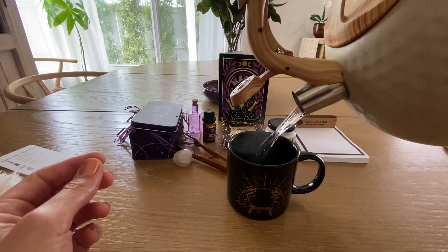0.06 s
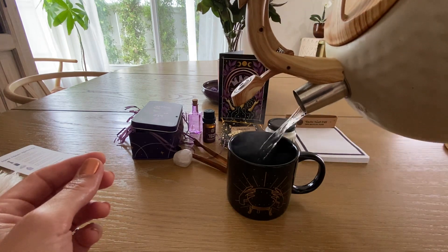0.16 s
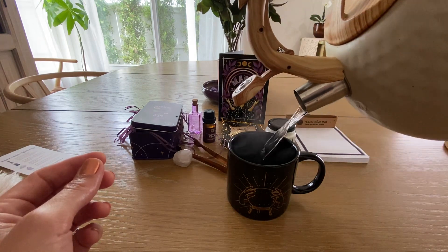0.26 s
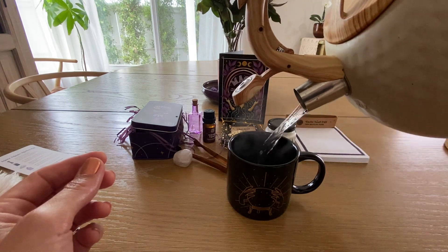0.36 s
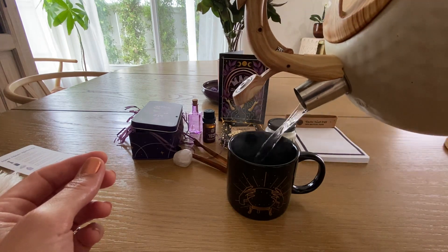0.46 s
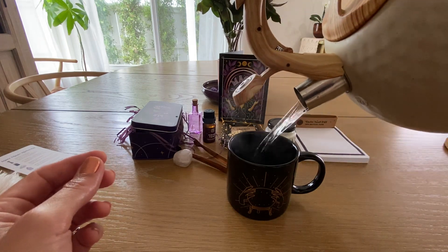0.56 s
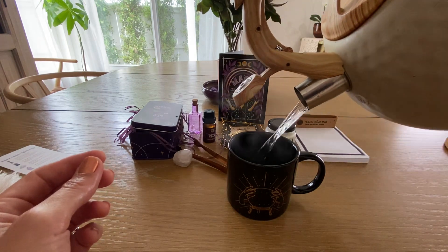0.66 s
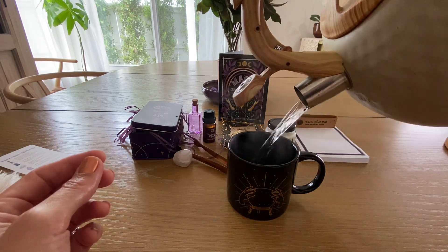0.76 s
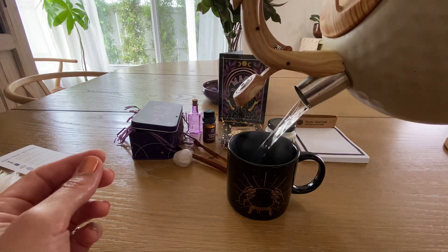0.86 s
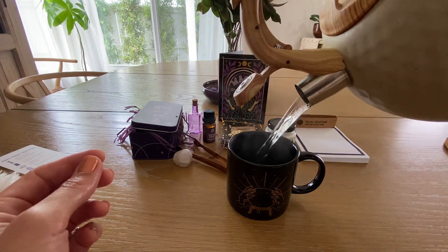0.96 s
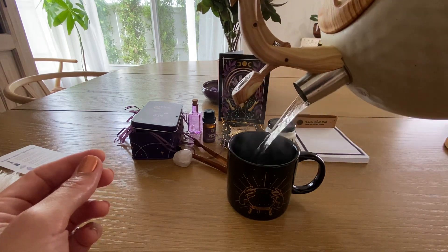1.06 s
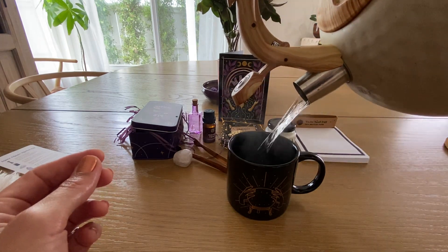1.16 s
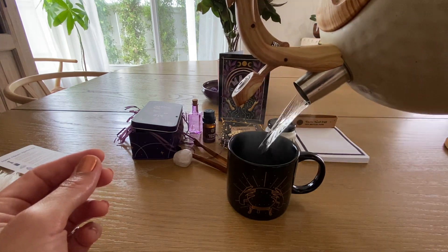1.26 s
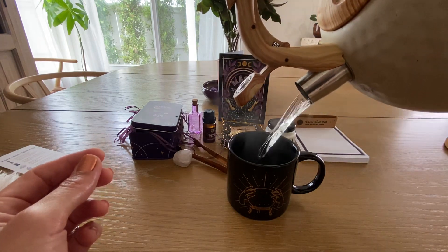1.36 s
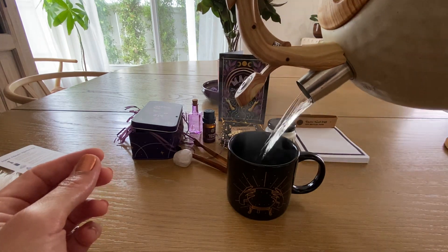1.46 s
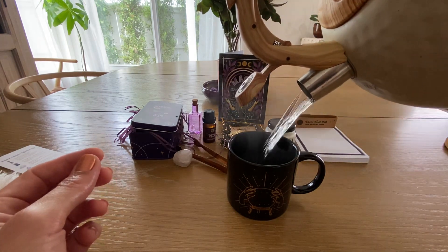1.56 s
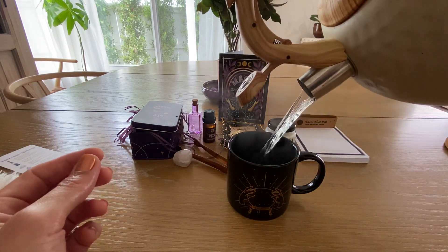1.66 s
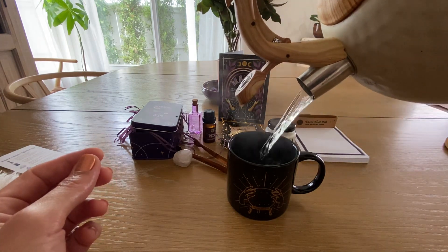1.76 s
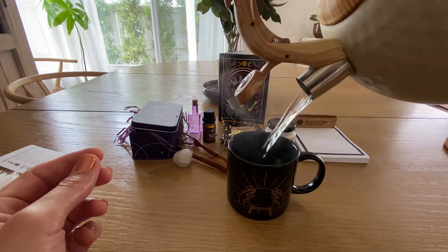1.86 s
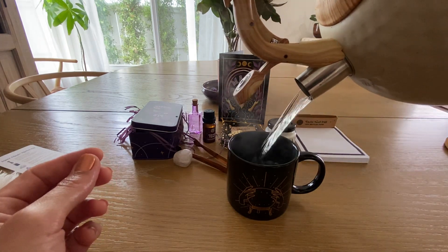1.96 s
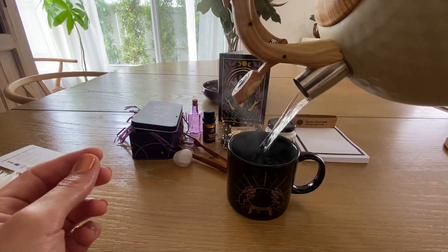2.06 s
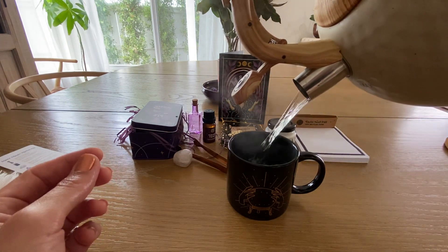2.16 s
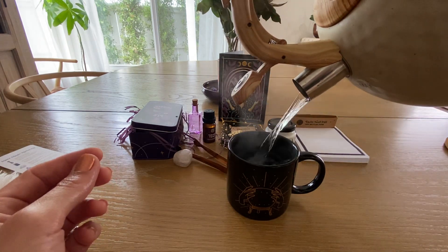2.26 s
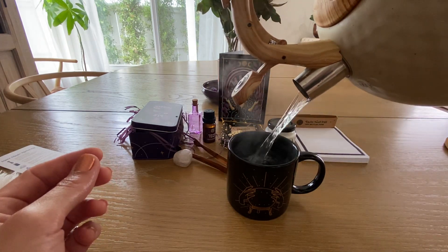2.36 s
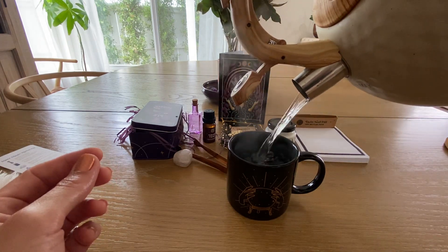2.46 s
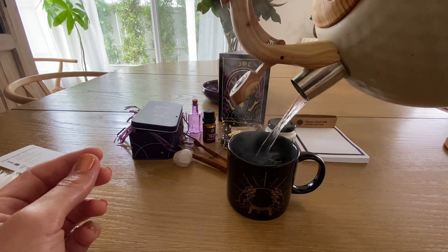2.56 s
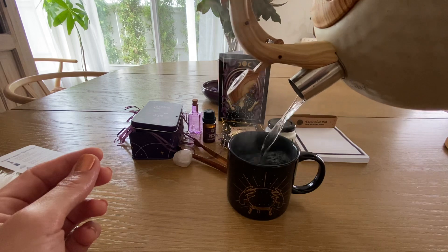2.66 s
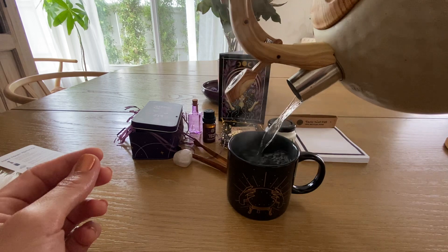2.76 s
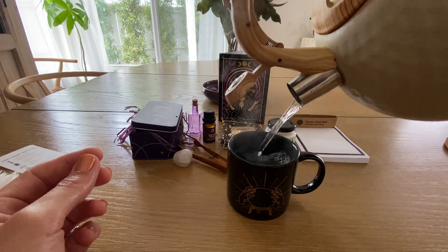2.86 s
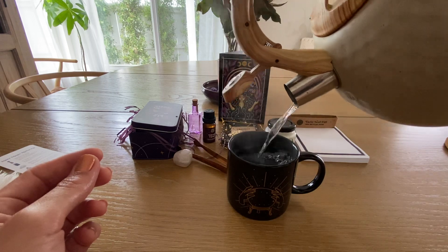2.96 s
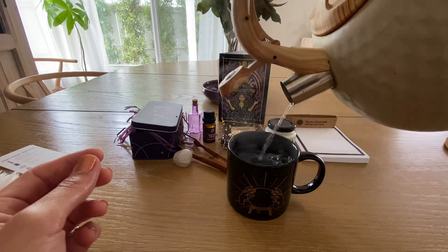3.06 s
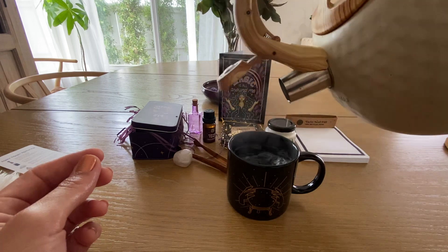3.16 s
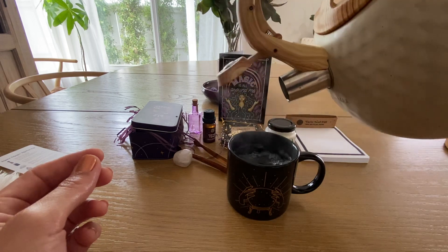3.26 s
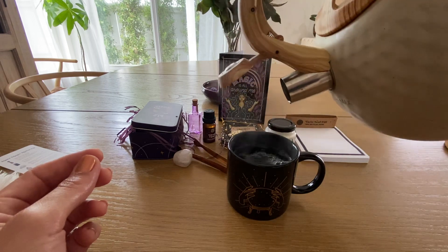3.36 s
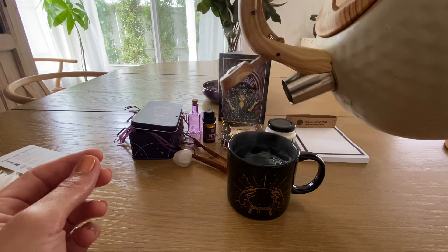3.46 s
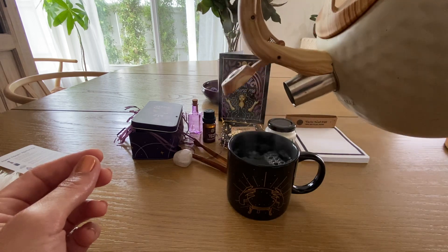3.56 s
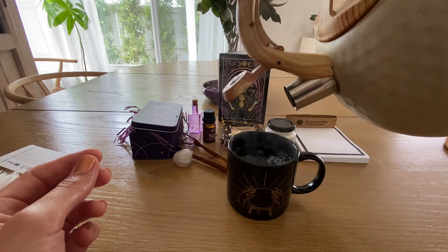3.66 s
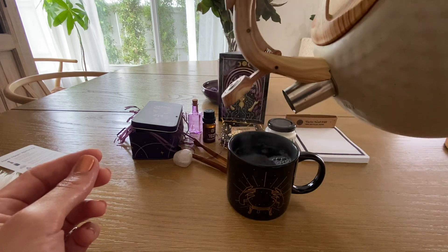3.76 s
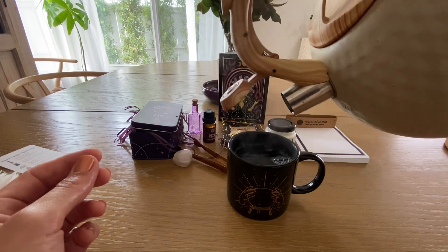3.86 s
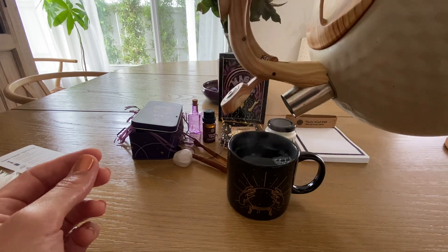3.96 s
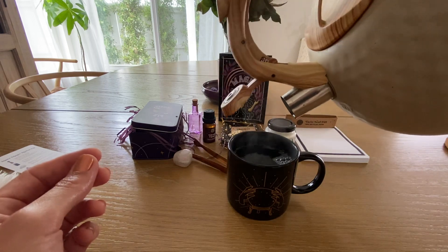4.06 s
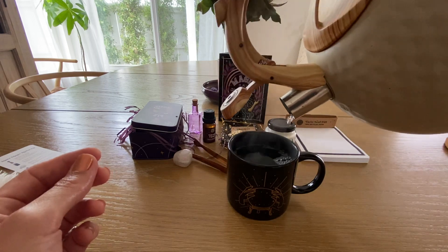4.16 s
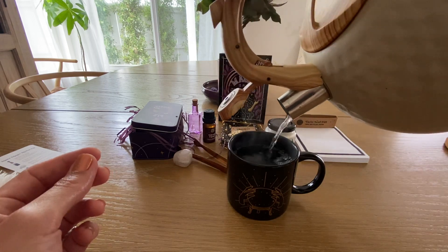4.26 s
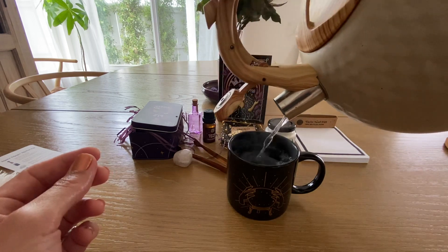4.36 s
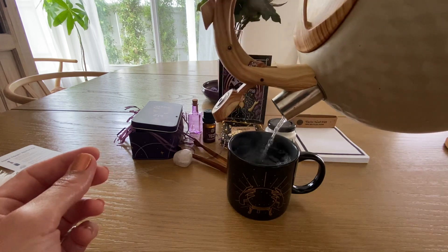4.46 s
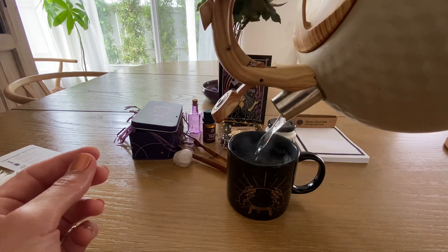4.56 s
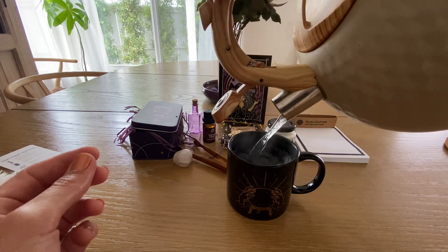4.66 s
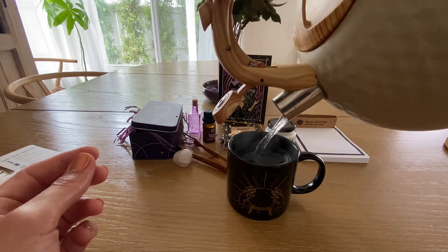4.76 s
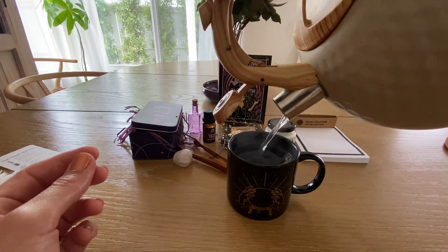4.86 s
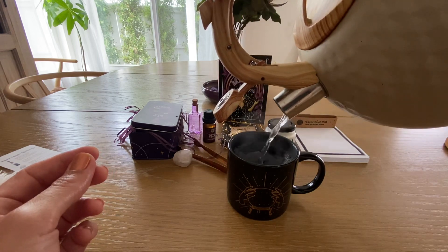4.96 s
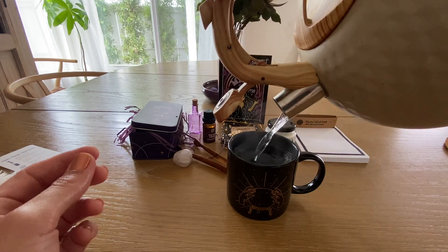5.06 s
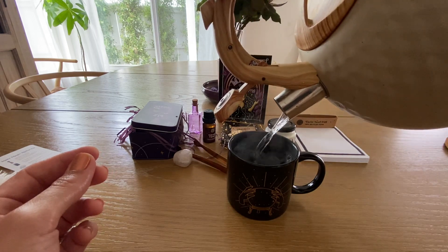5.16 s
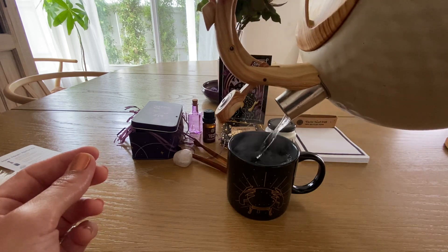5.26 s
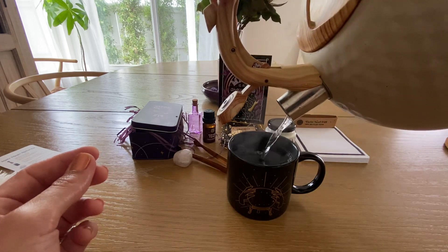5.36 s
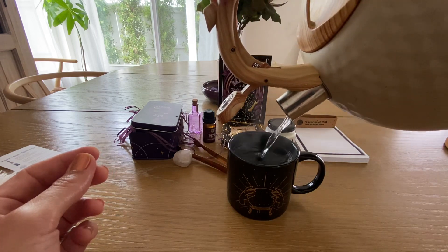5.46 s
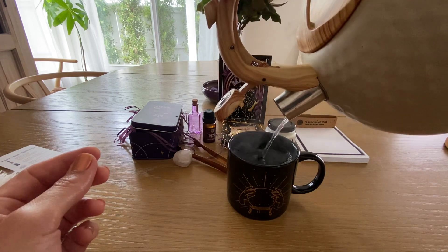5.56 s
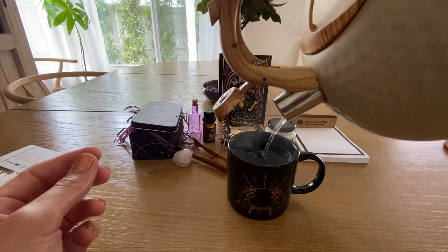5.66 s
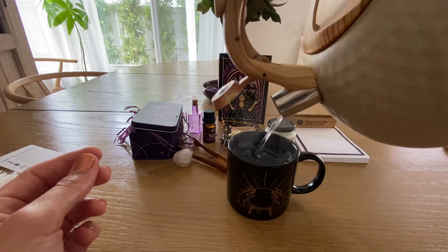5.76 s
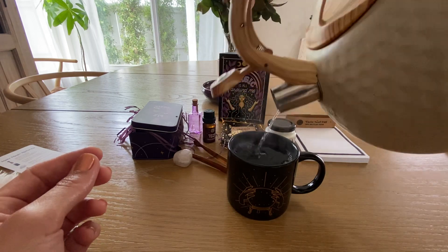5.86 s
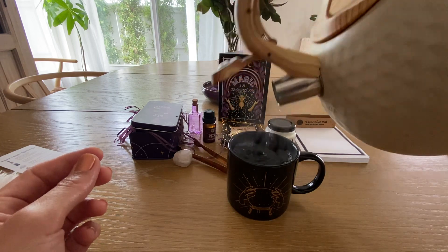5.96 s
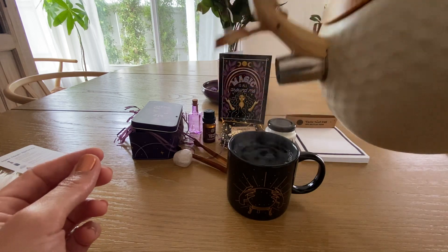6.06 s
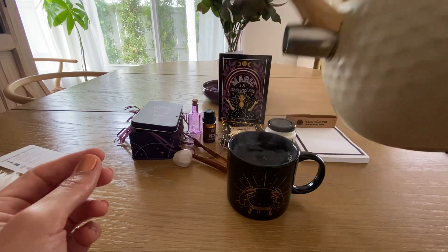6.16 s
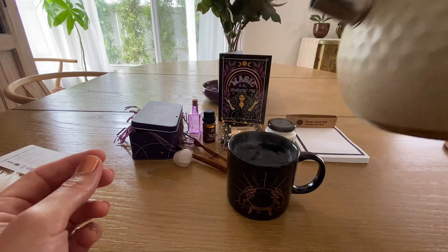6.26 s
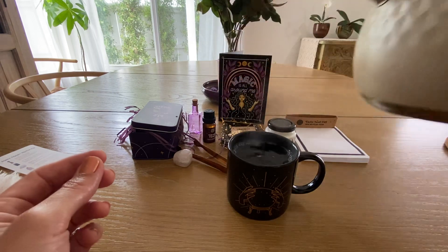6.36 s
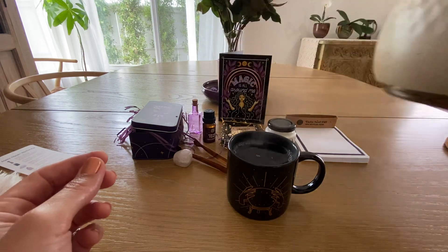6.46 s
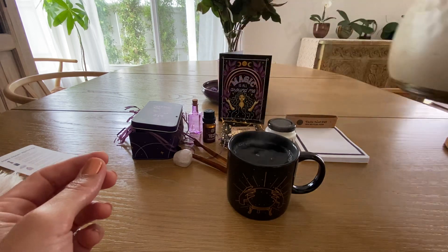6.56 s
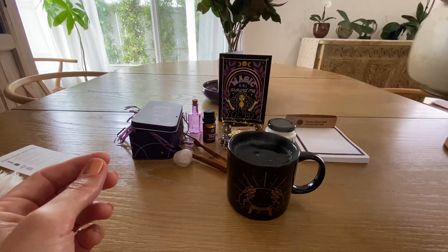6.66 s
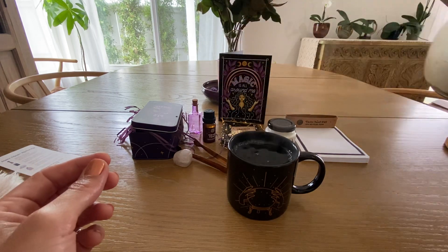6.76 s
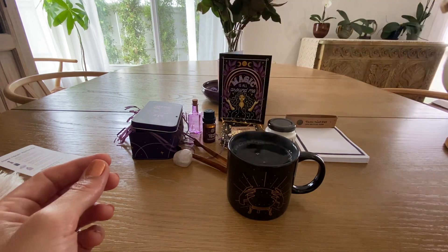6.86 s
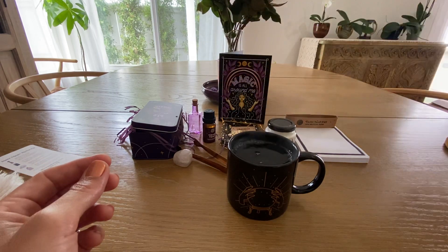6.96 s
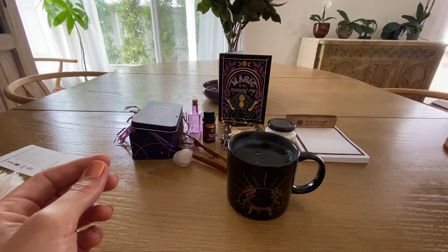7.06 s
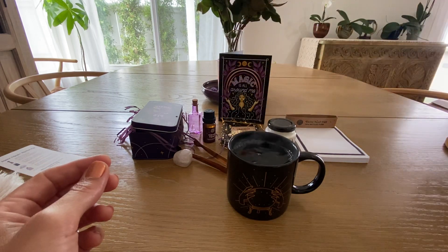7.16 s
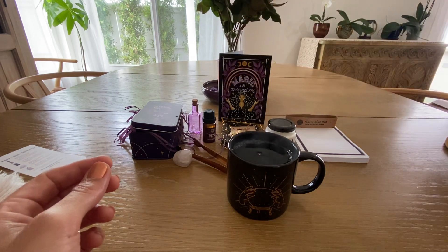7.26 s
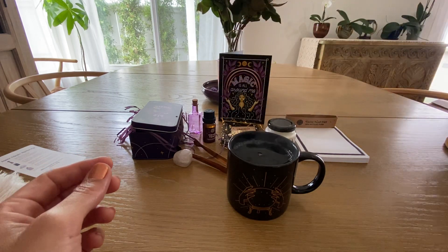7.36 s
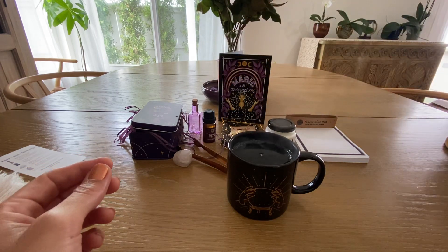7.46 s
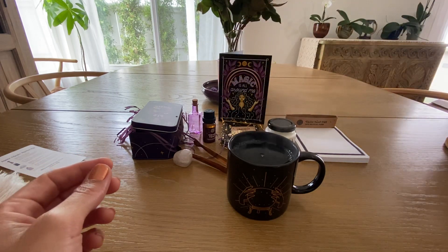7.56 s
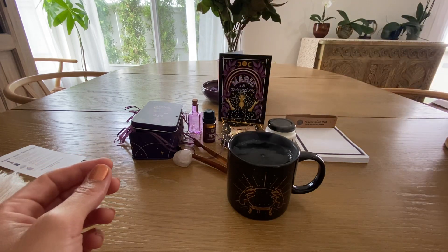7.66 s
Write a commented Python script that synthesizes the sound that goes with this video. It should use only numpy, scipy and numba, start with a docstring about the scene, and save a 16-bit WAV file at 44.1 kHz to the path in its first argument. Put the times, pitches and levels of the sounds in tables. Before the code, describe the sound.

Hot water pours from a kettle into a mug in two gurgling pours, then the kettle lands with a sharp knock and brief hiss.

```python
"""Hot water poured into a mug

Water runs from a kettle into a mug in two pours: damped gliding tones plop, noise clicks tick, foam fizzes on.
The kettle is put down with a knock of filtered noise and ringing modes; a noise hiss follows and dies away.
Low wavering tones and rumble hum throughout. Two microphone ports hear each source with a small lag.
"""
import sys
import numpy as np
from scipy import signal
from scipy.fft import rfft, irfft, next_fast_len
from scipy.io import wavfile
from scipy.ndimage import uniform_filter1d
from numba import njit

SR = 44100
rng = np.random.default_rng(int(sys.argv[2]) if len(sys.argv) > 2 else 0)


def master_out(mix):
    """Clip the mix to full scale and print it as 16-bit PCM to the path in sys.argv[1]."""
    frames = np.transpose(np.atleast_2d(mix))
    ceiling = np.clip(frames, -1, 1)
    pcm = np.round(ceiling * 32767).astype(np.int16)
    wavfile.write(sys.argv[1], SR, pcm)


N = 339349

# Single bubbles. Each row: start in seconds, peak level in dB before pan and mug, starting pitch in Hz.
PLOPS = [(0.108, -48.5, 865), (0.122, -46.5, 1015), (0.159, -49, 1480), (0.185, -44.5, 1120),
         (0.244, -45, 4360), (0.258, -42.5, 1930), (0.297, -48.5, 1990), (0.33, -40, 3300),
         (0.348, -37.5, 3090), (0.372, -39, 3170), (0.389, -38, 2830), (0.447, -52, 1580),
         (0.466, -38.5, 3100), (0.552, -40, 2790), (0.582, -50, 1760), (0.608, -45.5, 1720),
         (0.636, -46.5, 1430), (0.709, -54, 3100), (0.784, -46, 3040), (0.836, -41.5, 1484),
         (0.904, -44, 1530), (0.923, -37, 3240), (0.959, -44, 1610), (0.99, -43, 1490), (1.024, -34, 2800),
         (1.045, -45, 1510), (1.061, -37.5, 1800), (1.076, -31, 1790), (1.09, -36.5, 1060),
         (1.11, -38, 1380), (1.294, -44, 1430), (1.306, -47.5, 1030), (1.336, -48, 1000),
         (1.363, -37, 1010), (1.402, -38, 980), (1.419, -39, 980), (1.455, -52, 990), (1.472, -43, 1320),
         (1.493, -44, 1400), (1.509, -37.5, 1540), (1.527, -40.5, 1500), (1.528, -47, 633),
         (1.576, -41, 975), (1.597, -39, 876), (1.597, -54, 3000), (1.638, -49, 1590), (1.662, -48, 940),
         (1.668, -51, 2570), (1.694, -43, 1070), (1.704, -46, 944), (1.708, -46.5, 2380),
         (1.746, -49, 1430), (1.946, -54, 1600), (1.975, -45, 1750), (2.053, -52.5, 4550),
         (2.077, -47, 1560), (2.098, -50.5, 3940), (2.107, -51, 4440), (2.173, -44.5, 1680),
         (2.19, -55, 4300), (2.223, -52, 1600), (2.322, -53, 1600), (2.352, -57, 1630), (2.362, -48, 2430),
         (2.39, -53, 1600), (2.45, -53, 2600), (2.466, -45.5, 2700), (2.512, -47.5, 2520),
         (2.61, -48, 1880), (2.668, -52, 2600), (2.717, -45, 2500), (2.742, -43.5, 1750),
         (2.788, -43.5, 1705), (2.878, -59, 1730), (2.893, -51, 2830), (2.931, -39, 1810),
         (2.956, -44, 2970), (2.977, -42, 1900), (2.992, -45, 1680), (3.013, -51, 2900), (3.028, -44, 1520),
         (3.035, -45, 3940), (3.056, -44, 1640), (3.067, -41, 1730), (3.079, -43, 2480), (3.091, -37, 1960),
         (3.131, -35.5, 1810), (4.365, -40.5, 2060), (4.373, -47, 1970), (4.385, -46.5, 1900),
         (4.423, -56, 1790), (4.448, -36, 1710), (4.467, -38.5, 1470), (4.482, -41.5, 3140),
         (4.504, -42, 2940), (4.511, -44, 4400), (4.54, -44, 2780), (4.55, -41.5, 1850),
         (4.625, -48.5, 1920), (4.659, -61, 4200), (4.728, -57.5, 4100), (4.731, -49.5, 2100),
         (4.765, -55.5, 5400), (4.801, -42.5, 1870), (4.822, -48, 1600), (4.824, -48, 1040),
         (4.838, -54.5, 4200), (4.861, -54.5, 3860), (4.902, -55, 3800), (4.929, -58.5, 5300),
         (4.946, -51, 2640), (4.958, -43, 1840), (4.984, -36, 2060), (4.999, -39.5, 1430),
         (5.025, -39, 960), (5.026, -46, 1500), (5.036, -52, 5330), (5.0563, -52.5, 3900),
         (5.0975, -59, 4100), (5.164, -57, 810), (5.224, -47.5, 1700), (5.266, -56, 4080),
         (5.3203, -58, 4320), (5.337, -59, 3100), (5.428, -55.5, 2170), (5.443, -60, 4160),
         (5.459, -54.5, 4440), (5.48, -56, 3120), (5.4912, -52.5, 4300), (5.556, -42.5, 1960),
         (5.618, -41, 2870), (5.631, -41, 1830), (5.649, -42, 1740), (5.667, -30.5, 2110),
         (5.692, -40, 1284), (5.778, -48.5, 2110), (5.827, -50, 2700), (5.833, -45, 2060),
         (5.856, -44.5, 2100), (5.875, -52, 1660), (5.915, -43, 4230)]
# Narrow echo that lingers after each pour. Each row: start in seconds, starting level in dB, pitch in Hz.
LINGERING_ECHOES = [(3.14, -65, 1825), (5.92, -69, 4110)]
# Bubble voices. Each row: pitch in Hz, spread in Hz, relative level in dB, left minus right in dB.
BIG_BUBBLES = [(550, 9.9, -4.5, -1), (750, 100, -6.5, 19)]
# Each row: pitch in Hz, spread in Hz, relative level in dB, left minus right in dB.
MIDDLE_BUBBLES = [(960, 60, -1.5, 13), (1024, 63, -0.54, 2)]
# Each row: pitch in Hz, spread in Hz, relative level in dB, left minus right in dB.
SMALL_BUBBLES = [(1600, 263, 12, 7), (1900, 150, -7, -4.5), (2700, 300, 14, 13.5), (2930, 330, 15.5, -11.5),
                 (4160, 540, 16, 12.5)]
# Burble of the air in the filling mug. Each row: starting pitch in Hz, spread in Hz, relative level in dB,
# left minus right in dB.
BURBLE = [(1430, 98, 6.5, -4), (1500, 230, -6, -8)]
# Deep voices. Each row: time in seconds, gain of big bubbles, of middle bubbles and of burble, all in dB.
GURGLE = [(0.09, -83, -93, -106), (0.125, -86, -53, -70), (0.25, -96, -101, -74), (0.69, -101, -66.5, -77),
          (1.02, -100, -68, -59.5), (1.18, -57.5, -58, -66), (1.25, -86, -59.5, -62.5),
          (1.4, -58.5, -47, -61), (1.54, -61, -54, -55), (1.75, -68.5, -65, -67.5),
          (2.0, -63.5, -75, -63.5), (2.3, -75, -87, -57.5), (2.55, -101, -102, -68.5),
          (3.1, -63, -92, -68.5), (3.17, -72, -89, -79), (3.42, -104, -99, -95)]
# Stream over both pours. Each row: time in seconds, gain of small bubbles in dB, gain of spray and foam in dB.
FLOW = [(0.0, -74.5, -84), (0.13, -83.5, -51.5), (0.3, -66.5, -53.5), (0.7, -67, -58.5), (1.1, -66.5, -53),
        (1.31, -77.5, -68.5), (1.54, -72.5, -54.5), (1.94, -65.5, -53.5), (2.29, -63.5, -70.5),
        (2.85, -71.5, -54.5), (3.08, -62, -63), (3.21, -86, -62), (3.4, -103.5, -65.5), (4.25, -109, -73.5),
        (4.42, -65, -58), (4.6, -71, -73), (4.9, -73, -69.5), (5.04, -80, -73), (5.2, -76, -68),
        (5.5, -88, -68), (5.68, -65, -76), (5.8, -72, -63), (5.96, -78, -69), (6.07, -106, -95),
        (6.7, -110, -77), (6.9, -110, -100)]
# Growing air pockets lower the gurgle. Each row: time of lowest pitch in seconds,
# pitch in Hz to which the last middle voice sinks, climb back in seconds.
POCKETS = [(1.178, 553, 0.076), (1.53, 643, 0.047), (1.601, 810, 0.057), (1.806, 834, 0.1)]
# Mug's pan by pitch. Each row: pitch in Hz, left minus right in dB.
MUG_PAN = [(880, 4), (1020, 6.5), (1500, -1), (1900, -6.5), (2150, 8.5), (2800, 1), (3200, -5.5),
           (4300, 7.5), (6200, 17), (8000, -5.5), (16000, 1.5)]
# Mug resonances added to the water. Each row: centre in Hz, width in Hz, gain in dB.
MUG_RESONANCES = [(1000, 200, -10), (1590, 100, -3), (2700, 260, -3), (4120, 120, -5)]
# Mug and table top shaken by surges. Each row: centre in Hz, width in Hz, gain in dB.
SLOSH = [(334.4, 18, -7), (370, 140, -18), (604, 130, -13)]
# Noise of a broken surface. Each row: frequency in Hz, relative density in dB per Hz.
SPLASH_SPECTRUM = [(300, -44), (650, -8.5), (1000, 3.5), (1250, 3), (1580, 4.5), (2200, -8), (2750, 1.5),
                   (3500, -6.5), (4200, -3.5), (7000, -1), (16000, -21.5)]
# Single droplets and bursting foam. Each row: start in seconds, tone peak in dB before pan, pitch in Hz.
TICKS = [(0.147, -44, 6130), (0.1616, -36.5, 6140), (0.205, -41, 8100), (0.333, -35, 4630),
         (0.371, -37.5, 8350), (0.407, -45, 14000), (0.481, -43, 8850), (0.505, -55, 11000),
         (0.5288, -44.5, 6300), (0.553, -43, 6200), (0.602, -45, 8200), (0.8564, -45, 7660),
         (0.9234, -37.5, 10000), (1.023, -42.5, 8700), (1.0676, -38, 9350), (1.352, -44, 6160),
         (1.392, -53, 6160), (1.404, -41.5, 9100), (1.515, -38, 9500), (1.759, -45, 13000),
         (1.879, -50, 9700), (1.917, -42, 14200), (1.942, -45, 9820), (2.028, -36.5, 15300),
         (2.052, -47, 14800), (2.116, -46.5, 6300), (2.336, -53, 5200), (2.3654, -47.5, 6190),
         (2.4, -56, 6450), (2.476, -49, 4370), (2.5965, -46, 14300), (2.6126, -36.5, 13600),
         (2.667, -37.5, 14500), (2.8227, -41, 13700), (2.968, -36, 4730), (3.0003, -36, 6200),
         (3.0555, -35, 9060), (3.0777, -37, 11000), (3.1178, -39, 13000), (3.5624, -53, 8900),
         (3.57, -51, 14100), (3.582, -48, 13400), (3.676, -59, 14200), (3.8287, -53, 14100),
         (3.961, -53.5, 14700), (4.0176, -56, 11100), (4.07, -53, 14500), (4.1787, -49.5, 15100),
         (4.2481, -53, 14400), (4.281, -51, 14500), (4.2895, -34, 11000), (4.338, -42.5, 5000),
         (4.384, -37, 14200), (4.422, -42, 5270), (4.465, -46, 6600), (4.49, -37, 6840),
         (4.5101, -35.5, 6570), (4.5773, -48, 13300), (4.624, -54, 13100), (4.823, -40, 14300),
         (4.911, -46, 14700), (4.946, -49, 14100), (4.9776, -42.5, 6700), (5.026, -48, 5260),
         (5.057, -49, 6660), (5.556, -45, 14100), (5.618, -38, 14500), (5.6498, -37.5, 10600),
         (5.6673, -40.5, 6300), (5.6933, -30, 11000), (5.828, -47.5, 10900), (5.9146, -31, 14200),
         (5.9972, -58, 13900), (6.145, -61.5, 14400), (6.167, -49.5, 14500), (6.2337, -51, 10750),
         (6.294, -55, 10200), (6.454, -59, 13500), (6.648, -51, 14000), (6.7849, -53.5, 13600)]
# Foam pops. Each row: pitch in Hz, spread in Hz, relative level in dB, left minus right in dB.
FOAM = [(4630, 2600, -4, 24), (6190, 460, -12, 9), (9500, 510, -6.5, -16.5), (9700, 4700, -12, -22),
        (14200, 500, 4, 3), (14500, 370, 11.5, 3.5)]
# Noise of clicks and fizz. Each row: frequency in Hz, relative density in dB per Hz.
SPRAY_SPECTRUM = [(2060, -41), (3500, -7.5), (4340, -9), (5660, -2.5), (6280, 2.5), (7240, -8.5), (8740, 2),
                  (11000, 5), (12100, 0), (13400, 7), (14400, 14), (15300, 5), (16500, -30.5)]
# Faint taps as the kettle is moved. Each row: start in seconds, peak level in dB, pitch in Hz.
TAPS = [(6.316, -55, 513), (6.703, -59.5, 471)]
# Kettle base rocking down. Each row: blow in seconds, gain in dB.
BLOWS = [(6.8382, -12.5), (6.8401, -7), (6.8468, -13.5)]
# Clatter noise. Each row: frequency in Hz, relative density in dB per Hz.
CLATTER_SPECTRUM = [(290, -48.5), (500, -15.5), (1370, -53), (1980, -6.5), (2320, -14), (3400, -13.5),
                    (3710, -22), (4360, -11), (5670, -11), (10000, -10.5), (12000, -19.5), (12500, -23.5),
                    (13200, -27), (14900, -17.5), (16500, -40.5)]
# Squeak of first contact. Each row: centre in Hz, width in Hz, relative level in dB.
SQUEAK = [(5900, 270, -2.5), (2050, 130, -12.5), (3000, 300, -14.5)]
# Thud in the table. Each row: frequency in Hz, relative response in dB.
THUD_SPECTRUM = [(18, -45), (30, -12.5), (55, -19.5), (120, -5), (200, -5), (370, -1), (450, -5),
                 (500, -31), (680, -45), (1140, -95)]
# Kettle modes. Each row: pitch in Hz, peak level in dB, 60 dB decay in seconds.
KETTLE_MODES = [(470, -74, .9), (1960, -58, 0.34), (5930, -37.5, .2), (6330, -57, .2), (14300, -70, 0.92)]
# Resonances in hiss and clatter. Each row: centre in Hz, width in Hz, level in dB before colouring.
KETTLE_BANDS = [(14150, 200, -5.5), (2056, 280, -16), (4400, 300, -12.5), (5360, 300, -19.5),
                (5750, 200, -9.5), (6300, 190, -9), (7510, 120, -13.5)]
# Hiss over time. Each row: time in seconds, gain in dB.
HISS_LEVEL = [(6.85, -16), (6.88, -31.5), (6.934, -37), (7.132, -36.5), (7.3, -50.5), (7.466, -64),
              (7.6, -78.5), (7.69, -90.5)]
# Hiss noise. Each row: frequency in Hz, relative density in dB per Hz.
HISS_SPECTRUM = [(240, -36), (400, -8.5), (453, 2), (546, -19), (899, -6), (2150, -2.5), (3760, -4),
                 (5220, 0), (5730, -0.5), (10200, -7.5), (11200, -21), (11900, -76), (13100, -32),
                 (14600, -29), (16500, -97)]
# Hum, sinking for a while and coming back. Each row: time in seconds, gain in dB.
HUM_LEVEL = [(0.0, -59.5), (1.26, -58.5), (1.37, -63), (1.88, -68.5), (2.87, -69.5), (3.45, -62.5),
             (3.62, -61), (4.45, -58.5), (5.01, -56.5), (5.16, -58.5), (5.72, -57), (6.3, -59.5),
             (7.69, -61.5)]
# Hum tones. Each row: pitch in Hz, width in Hz, level in dB relative to the rumble.
HUM_TONES = [(62, 8, -12), (134.5, 2.5, -5), (200, 10, -12), (263, 2.5, -6)]
# Rumble noise. Each row: frequency in Hz, relative density in dB per Hz.
RUMBLE_SPECTRUM = [(12, -31), (25, -15), (55, -19.5), (100, -7.5), (140, -8.5), (250, -0.5), (320, -4),
                   (450, -25), (600, -60)]
# Tone of constant level. One row: pitch in Hz, width in Hz, level in dB.
STEADY_TONE = (354, 2.4, -71)
# Room air noise. Each row: frequency in Hz, relative density in dB per Hz.
AIR_SPECTRUM = [(160, -22), (280, -15), (467, -16.5), (728, -20), (1010, -26.5), (2400, -37.5),
                (7400, -35.5), (10800, -41), (12100, -42), (13900, -36.5), (16500, -44.5)]

# samples by which the left port leads
MUG_LAG, SPRAY_LAG, KETTLE_LAG, HUM_LAG, HISS_LAG = 2, 4, -31, -30, 22
PAN_SCATTER_DB = 2.5

BIG_UNDER_SMALL_DB, MIDDLE_UNDER_SMALL_DB = -28, -19  # a few larger bubbles come with any flow
MIDDLE_CYCLES = 20  # 60 dB decay in cycles
SMALL_RUSH_GAIN, BURBLE_RUSH_GAIN = .65, .5  # dense rush against single bubbles
CLUMP_S, CLUMP_DB = .05, 2  # bubbles come in clumps with lulls between
POCKET_FALL_S = 0.018
FILL_RISE_PER_S = 0.077  # burble pitch climbs by this share of its start as the mug fills
PLOP_T60_S, PLOP_CYCLES = 0.008, 16  # decay is their sum: large bubbles ring longer
TRAIL_S, TRAIL_SPREAD, TRAIL_DB = .02, .22, -10  # latest start, widest pitch share, highest level under plop
OVERTONE_DB, SPLASH_DB = -9, -13  # under the plop
ECHO_WIDTH_HZ, ECHO_T60_S = 90, .6

FLURRY_S, FLURRY_DB, CLICK_SCATTER_DB = .025, 4.5, 5
FOAM_RESTS_DB = -99  # small-bubble flow at which pops are halved
FIZZ_DB, CLICK_DB = -14.5, -5  # fizz under the clicks, click noise under the tick tone
FOAM_TOP_HZ, FOAM_DULL_DB, FOAM_CLEAR_S = 11000, -14, 3.84  # foam's top starts dull and clears

BLOW_FADE_S, CLATTER_PAN_DB = 0.0034, -3.5
SQUEAK_S, SQUEAK_RISE_S, SQUEAK_HOLD_S, SQUEAK_FADE_S, SQUEAK_DB = 6.828, 0.0062, 0.0034, 0.0015, -16.5
THUD_S, THUD_PEAK_DB, THUD_TURN_RAD = 6.842, -10, -1.9  # turn: phase of right port against left
HISS_PAN_DB, SPUTTER_S, SPUTTER_DB = 3.5, .006, 1

AIR_DB, AIR_ALIKE = -75.5, .35  # alike: power share common to both ports
ROOM_DB, ROOM_T60_S, ROOM_DULL_HZ = -14, .5, 4550
CEILING, TOP_HZ = .75, 16600


def bubbles():
    """The stream drags air under: bubble swarms, the loudest plops, their splash, and the mug's dull slosh."""
    big, middle, burble, small = stream_swarms()
    plops = single_plops() + lingering_echoes()
    s, db, _ = np.transpose(PLOPS)
    splash = bursts(s, db + SPLASH_DB, 0.0047, SPLASH_SPECTRUM, MUG_LAG)
    water = big + middle + burble + small + plops + splash
    in_mug = sum(undb(db) * resonate(water, hz, width) for hz, width, db in MUG_RESONANCES)
    # surges of bubbles shake the mug and the table top
    surge = uniform_filter1d(np.abs(small[0] + plops[0]), size=900)
    shake = sum(undb(db) * pair(lambda: waver(hz, width), HUM_LAG, 0.96) for hz, width, db in SLOSH)
    return water + in_mug + surge * shake


def stream_swarms():
    """Big, middle, burbling and small bubbles, each a swarm of damped tones following the flow."""
    flow = undb(curve(FLOW, 1))
    big_gain = np.hypot(undb(curve(GURGLE, 1)), undb(BIG_UNDER_SMALL_DB) * flow)
    middle_gain = np.hypot(undb(curve(GURGLE, 2)), undb(MIDDLE_UNDER_SMALL_DB) * flow)
    big = big_gain * swarm(BIG_BUBBLES, 3.6, 0.0029, MUG_LAG, 0.17, count=1000)
    middle = middle_gain * swarm(MIDDLE_BUBBLES, MIDDLE_CYCLES, 0.013, MUG_LAG, 0.065, count=1800,
                                 bend=pocket_bend())
    clumps = undb(CLUMP_DB * chance_walk(CLUMP_S))
    small = clumps * flow * swarm(SMALL_BUBBLES, 22, 0.0076, MUG_LAG, SMALL_RUSH_GAIN, count=4500)
    filling = 1 + FILL_RISE_PER_S * np.arange(N) / SR
    burble = swarm(BURBLE, 22, 0.0011, MUG_LAG, BURBLE_RUSH_GAIN, count=4000, bend=filling)
    burble = clumps * undb(curve(GURGLE, 3)) * burble
    return big, middle, burble, small


def pocket_bend():
    """Pitch factor that drops as an air pocket grows and climbs back as it breaks up."""
    now, bend = np.arange(N) / SR, np.ones(N)
    for s, hz, climb_s in POCKETS:
        depth = np.interp(now, [s - POCKET_FALL_S, s, s + climb_s], [0, 1, 0])
        bend = bend - depth * (1 - hz / MIDDLE_BUBBLES[-1][0])
    return bend


def single_plops():
    """Damped gliding tones, each with two quieter bubbles of nearby pitch behind and a higher, shorter one."""
    s, db, hz = np.transpose(PLOPS)
    t60 = PLOP_T60_S + PLOP_CYCLES / hz
    plops = grains(s, db, hz, t60, side_db(hz), MUG_LAG, 0.00045, 0.0077)
    for late, off, size in rng.random((2, 3, len(s))):
        near = hz * (1 + TRAIL_SPREAD * (2 * off - 1))
        trail_db = db + TRAIL_DB - 8 * size
        plops = plops + grains(s + TRAIL_S * late, trail_db, near, t60, side_db(near), MUG_LAG, 0.0013, 0.049)
    high = hz * (1.3 + .6 * rng.random(len(s)))
    return plops + grains(s, db + OVERTONE_DB, high, t60 / 2, side_db(high), MUG_LAG, 0.00013, .1)


def lingering_echoes():
    """A narrow echo lingers after each pour: a wavering band of noise that decays evenly."""
    now, total = np.arange(N) / SR, 0
    for s, db, hz in LINGERING_ECHOES:
        fade = (now >= s) * 1000 ** (-np.maximum(now - s, 0) / ECHO_T60_S)
        total = total + undb(db) * fade * pair(lambda: waver(hz, ECHO_WIDTH_HZ), MUG_LAG, 0.45)
    return total


def spray():
    """Foam bursts in flurries of tiny pops and clicks over a thin fizz; the loudest droplets come one by one."""
    flurries = undb(FLURRY_DB * np.clip(chance_walk(FLURRY_S), -2, 1.3))
    pops = swarm(FOAM, 29, 0.00049, SPRAY_LAG, 0.13, count=5000)
    pops = pops / (1 + undb(FOAM_RESTS_DB - curve(FLOW, 1)))
    when_s, big = rng.random(1500) * N / SR, rng.standard_normal(1500)
    click_db = CLICK_SCATTER_DB * np.clip(big, -3, 2)
    clicks = unit(bursts(when_s, click_db, 0.005, SPRAY_SPECTRUM, SPRAY_LAG))
    bed = undb(FIZZ_DB) * pair(lambda: noise(SPRAY_SPECTRUM), SPRAY_LAG, .5)
    foam = undb(curve(FLOW, 2)) * unit((0.2 * pops + clicks) * flurries + bed)
    top = signal.sosfiltfilt(signal.butter(3, FOAM_TOP_HZ, "high", fs=SR, output="sos"), foam)
    top_db = np.interp(np.arange(N) / SR, [FOAM_CLEAR_S - .6, FOAM_CLEAR_S], [FOAM_DULL_DB, 0])
    foam = foam - top * (1 - undb(top_db))
    s, db, hz = np.transpose(TICKS)
    tones = grains(s, db, hz, np.full(len(s), .005), side_db(hz), SPRAY_LAG, 0.000077, 0.)
    return foam + tones + bursts(s, db + CLICK_DB, 0.0025, SPRAY_SPECTRUM, SPRAY_LAG)


def taps():
    """Short dull notes, each with a soft click, as the kettle is moved."""
    s, db, hz = np.transpose(TAPS)
    notes = grains(s, db, hz, np.full(len(s), .08), 0 * s, KETTLE_LAG, .002, 0.)
    return notes + bursts(s, db - 2.0, 0.0015, SPLASH_SPECTRUM, KETTLE_LAG)


def knock():
    """The kettle lands: a squeak of first contact, a clatter, a thud in the table and a few ringing modes."""
    hz, db, t60 = np.transpose(KETTLE_MODES)
    modes = grains(np.full(len(hz), 6.84), db, hz, t60, 0 * hz, KETTLE_LAG, .002, 0.)
    return clatter() + squeak() + thud() + modes


def clatter():
    """Kettle noise driven by blows that fade exponentially."""
    now, force = np.arange(N) / SR, 0
    for s, db in BLOWS:
        force = force + undb(db) * (now >= s) * np.exp(-np.maximum(now - s, 0) / BLOW_FADE_S)
    rattle = pair(lambda: unit(colour(kettle_noise(), CLATTER_SPECTRUM)), KETTLE_LAG, 0.22)
    return force * pan_gain(CLATTER_PAN_DB) * rattle


def squeak():
    """Rubbing contact: narrow bands swell, hold briefly and fade."""
    after = np.arange(N) / SR - SQUEAK_S
    fading = np.maximum(after - SQUEAK_RISE_S - SQUEAK_HOLD_S, 0)
    rub = np.clip(after / SQUEAK_RISE_S, 0, 1) ** 3 * np.exp(-fading / SQUEAK_FADE_S)
    bands = pair(lambda: sum(undb(db) * waver(hz, width) for hz, width, db in SQUEAK), HISS_LAG, 0.21)
    return undb(SQUEAK_DB) * rub * bands


def thud():
    """One blow rings the table, which carries it to the two ports out of phase."""
    blow = 1. * (np.arange(N) == int(THUD_S * SR))
    low = colour(blow, THUD_SPECTRUM)
    low = signal.hilbert(low / np.abs(low).max(), next_fast_len(N))[:N]
    turned = [low * np.exp(-.5j * THUD_TURN_RAD), low * np.exp(.5j * THUD_TURN_RAD)]
    return undb(THUD_PEAK_DB) * np.real(turned)


def kettle_noise():
    """Noise lifted at the resonant bands of the kettle."""
    return rng.standard_normal(N) + sum(undb(db) * waver(hz, width) for hz, width, db in KETTLE_BANDS)


def hiss():
    """Noise with resonant bands follows the knock, holds while sputtering a little, then dies away."""
    rise = np.clip((np.arange(N) / SR - 6.845) / 0.029, 0, 1)
    gain = undb(curve(HISS_LEVEL, 1)) * pan_gain(HISS_PAN_DB) * rise
    sputter = undb(SPUTTER_DB * chance_walk(SPUTTER_S))
    return gain * sputter * pair(lambda: unit(colour(kettle_noise(), HISS_SPECTRUM)), HISS_LAG, 0.18)


def hum():
    """Wavering low tones over a rumble, one steady tone and the faint air of the room."""
    def low():
        return unit(noise(RUMBLE_SPECTRUM) + sum(undb(db) * waver(hz, width) for hz, width, db in HUM_TONES))
    hz, width, db = STEADY_TONE
    steady = undb(db) * pair(lambda: waver(hz, width), HUM_LAG, 1.0)
    air = undb(AIR_DB) * pair(lambda: noise(AIR_SPECTRUM), HUM_LAG, AIR_ALIKE)
    return undb(curve(HUM_LEVEL, 1)) * pair(low, HUM_LAG, 0.97) + steady + air


def room(x):
    """Echo of the walls: a dull noise tail that decays evenly, another one at each port."""
    t = np.arange(SR) / SR
    tail = rng.standard_normal((2, SR)) * 1000 ** (-t / ROOM_T60_S) * np.clip(t / 0.0029, 0, 1)
    tail = signal.lfilter(*signal.butter(1, ROOM_DULL_HZ, fs=SR), tail)
    tail = tail / np.sqrt(np.sum(tail ** 2, axis=1, keepdims=True))
    return undb(ROOM_DB) * signal.fftconvolve(x, tail, axes=1)[:, :N]


def swarm(pitches, cycles, rise_s, lag, rush, count, bend=None):
    """Many bubbles at chance moments, near the favoured pitches, over a rush too dense to tell apart."""
    when, which = rng.random((count, 2)).T
    off, pan, place, big = rng.standard_normal((count, 4)).T
    hz, spread_hz, db, pan_db = np.array(pitches)[(which * len(pitches)).astype(int)].T
    hz = np.clip(hz + spread_hz * off, .6 * hz, 16000)
    if bend is not None:  # bends the single bubbles, not the rush
        hz = hz * bend[(when * N).astype(int)]
    size_db = db + 5 * np.clip(big, -3, 1.7)
    pan_db = pan_db + PAN_SCATTER_DB * pan
    lags = lag + (2 * place).astype(np.int64)
    single = unit(grains(when * N / SR, size_db, hz, cycles / hz, pan_db, lags, rise_s, 0.27))
    dense = sum(undb(db) * pan_gain(pan_db) * pair(lambda: waver(hz, 2 * spread_hz), lag, 0.33)
                for hz, spread_hz, db, pan_db in pitches)
    return single + rush * unit(dense)


def grains(s, db, hz, t60, pan_db, lag, rise_s, glide):
    """Damped tones as both ports hear them; db is the peak that each reaches before pan."""
    start, rise = (s * SR).astype(np.int64), np.exp(-1 / (rise_s * SR))
    fade_s = t60 / np.log(1000)
    top_s = rise_s * np.log(1 + fade_s / rise_s)  # moment of the peak
    size = undb(db) / (np.exp(-top_s / fade_s) * (1 - np.exp(-top_s / rise_s)))
    left = ring(N, start, hz, t60, size * undb(pan_db / 2), rise, glide)
    right = ring(N, np.maximum(start + lag, 0), hz, t60, size * undb(-pan_db / 2), rise, glide)
    return np.array([left, right])


@njit
def ring(length, start, hz, t60, size, rise, glide):
    """Damped tones that swell for a moment and, with glide above 0, climb in pitch as they fade."""
    out = np.zeros(length)
    for k in range(len(hz)):
        n = t60[k] * SR
        fade, step = 1000 ** (-1 / n), hz[k] / SR
        phase, gain, missing = 0., size[k], 1.
        for i in range(start[k], min(start[k] + int(n), length)):
            out[i] += gain * (1 - missing) * np.sin(2 * np.pi * phase)
            phase += step * (1 + glide * (i - start[k]) / n)
            gain *= fade
            missing *= rise
    return out


def bursts(s, db, fade_s, points, lag):
    """Short puffs of coloured noise that start at once and fade."""
    start = np.zeros(N)
    start[(s * SR).astype(int)] = undb(db)
    puffs = signal.lfilter([1], [1, -np.exp(-1 / (fade_s * SR))], start)
    return puffs * pair(lambda: noise(points), lag, 0.026)


def pair(make, lag, alike):
    """A noise at both ports: a shared part that arrives with a lag, and a part of each port's own."""
    shared, alike = make(), np.clip(alike, 0, 1)
    common = np.array([shared, np.roll(shared, lag)])
    own = np.array([make(), make()])
    return np.sqrt(alike) * common + np.sqrt(1 - alike) * own


def pan_gain(pan_db):
    """Gains of left and right port for a left minus right level."""
    return undb(pan_db * np.array([[.5], [-.5]]))


def side_db(hz):
    """Left minus right level of drops of these pitches, with scatter."""
    points = np.array(MUG_PAN)
    mug_db = np.interp(np.log(hz), np.log(points[:, 0]), points[:, 1])
    return mug_db + PAN_SCATTER_DB * rng.standard_normal(len(hz))


def noise(points):
    """Coloured noise of rms 1."""
    return unit(colour(rng.standard_normal(N), points))


def colour(x, points):
    """Causal filter with the given (Hz, dB) response, built from the cepstrum of the log gain."""
    size = 4096
    hz, db = np.transpose(points)
    bin_hz = np.arange(size // 2 + 1) * SR / size
    log_gain = np.interp(np.log(bin_hz + 1), np.log(hz), db) * np.log(10) / 20
    cep = irfft(log_gain)
    cep[1:size // 2] *= 2  # folded: minimum phase
    cep[size // 2 + 1:] = 0
    return signal.oaconvolve(x, irfft(np.exp(rfft(cep))))[:N]


def waver(hz, width_hz):
    """A tone that wavers: noise through a narrow resonance, rms 1."""
    return unit(resonate(rng.standard_normal(N), hz, width_hz))


def resonate(x, hz, width_hz):
    """One resonance, gain 1 at its centre."""
    return signal.lfilter(*signal.iirpeak(hz, hz / width_hz, fs=SR), x)


def chance_walk(hold_s):
    """Random levels held for a moment and eased into each other; spread near 1."""
    hold = int(hold_s * SR)
    steps = np.repeat(rng.standard_normal(N // hold + 1), hold)
    return uniform_filter1d(steps, hold // 4)[:N]


def curve(rows, column):
    """One column of a table, joined by straight lines in time."""
    rows = np.array(rows)
    return np.interp(np.arange(N) / SR, rows[:, 0], rows[:, column])


def undb(db):
    """Gain of a level in dB."""
    return 10 ** (np.asarray(db) / 20)


def unit(x):
    """Scaled to rms 1."""
    return x / np.sqrt(np.mean(x ** 2))


def scene():
    """Water and taps with the room's echo, then the knock, hiss and hum without it."""
    near = bubbles() + spray() + taps()
    return near + room(near) + knock() + hiss() + hum()


def record(dry):
    """The recorder rounds the loudest peaks and cuts the top."""
    rounded = CEILING * np.tanh(dry / CEILING)
    return signal.sosfilt(signal.ellip(10, .2, 80, TOP_HZ, fs=SR, output="sos"), rounded)


dry = scene()
out = record(dry)
master_out(out)
```